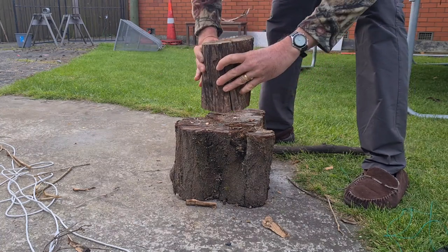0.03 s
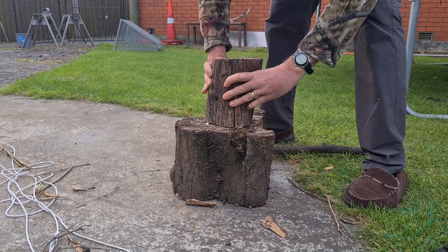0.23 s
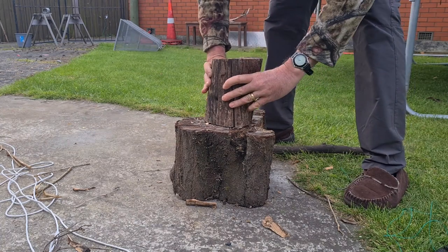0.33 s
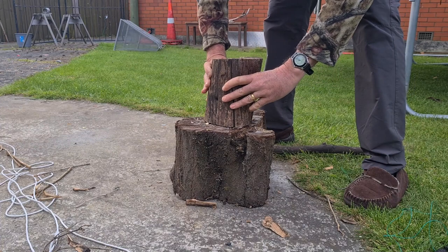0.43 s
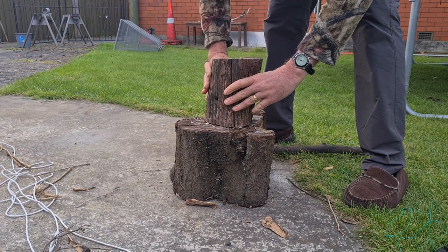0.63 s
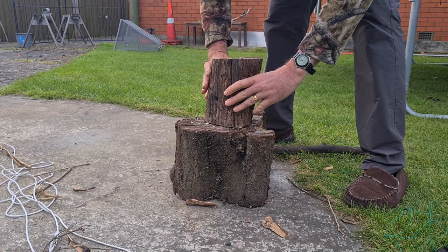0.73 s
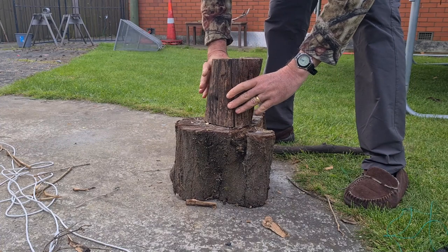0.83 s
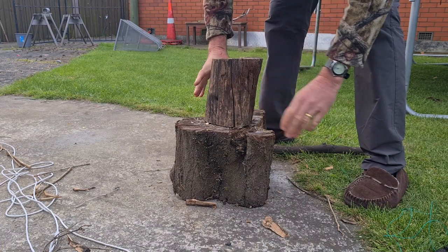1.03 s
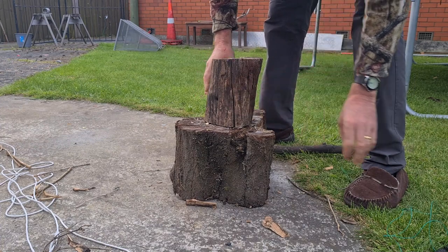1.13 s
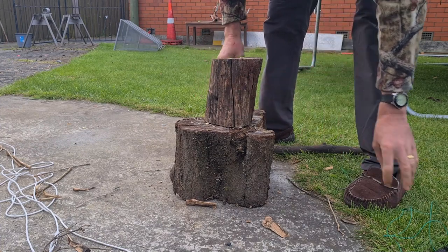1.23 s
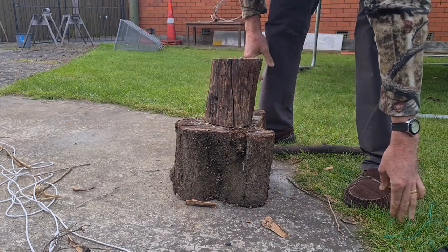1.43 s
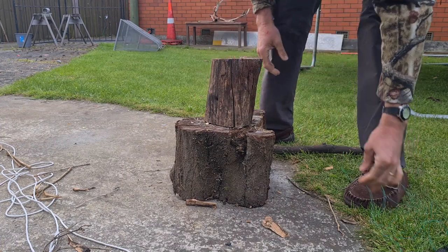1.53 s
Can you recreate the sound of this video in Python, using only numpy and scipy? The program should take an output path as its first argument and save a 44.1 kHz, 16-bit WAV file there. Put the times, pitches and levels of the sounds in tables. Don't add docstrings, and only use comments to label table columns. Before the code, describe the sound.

A single dry wooden knock as a short log lands on a stump and rocks flat, with a gritty crunch and short yard echo; afterwards quiet air, low distant traffic and small bird whistles, heard in close stereo.

```python
import sys
import numpy as np
from scipy import signal
from scipy.fft import rfft, irfft
from scipy.io import wavfile

SR = 44100
rng = np.random.default_rng(int(sys.argv[2]) if len(sys.argv) > 2 else 0)


def inscribe(sig):
    pcm = np.round(np.clip(np.atleast_2d(sig).T, -1, 1) * 32767)
    wavfile.write(sys.argv[1], SR, pcm.astype(np.int16))


def voltage_ratio(level):
    return 10 ** (np.asarray(level, float) / 20)


N = 70560
TIME = np.arange(N) / SR
BIN_HZ = np.arange(N // 2 + 1) * SR / N


def rms_one(x):
    return x / np.sqrt(np.mean(x ** 2) + 1e-20)


def at_hz(points, hz):
    point_hz, value = np.transpose(points)
    return np.interp(np.log(hz), np.log(point_hz), value)


def in_time(rows):
    return np.interp(TIME, *np.transpose(rows))


def pan(db):
    return voltage_ratio(np.array([[db / 2], [-db / 2]]))


def colour(x, spectrum):
    hz = np.maximum(BIN_HZ, 1)
    inside = (hz >= spectrum[0][0]) & (hz < spectrum[-1][0])
    return rms_one(irfft(rfft(x) * voltage_ratio(at_hz(spectrum, hz)) * inside, N))


def spaced(x, lag_ms, sets_in_hz=504):
    share = BIN_HZ ** 2 / (BIN_HZ ** 2 + sets_in_hz ** 2)
    phase = 2 * np.pi * BIN_HZ * lag_ms / 1000 * share
    return np.stack([x[0], irfft(rfft(x[1]) * np.exp(-1j * phase), N)])


# (frequency [Hz], likeness [0-1])
FIELD_LIKENESS = [(30, 0.98), (300, 0.82), (700, 0.75), (1300, 0.6), (2400, 0.63), (4400, 0.083),
                  (8000, 0.25), (15000, 0.0089)]


def wide_noise():
    alike = np.clip(at_hz(FIELD_LIKENESS, np.maximum(BIN_HZ, 1)), 0, 1)
    mid, side = rfft(rng.standard_normal((2, N)))
    stereo = np.sqrt(1 + alike) * mid + np.sqrt(1 - alike) * side * [[1], [-1]]
    return spaced(irfft(stereo, N), lag_ms=0.526)


def resonance(x, hz, width_hz):
    r = np.exp(-np.pi * width_hz / SR)
    for _ in range(2):
        x = signal.lfilter([1, 0, -1], [1, -2 * r * np.cos(2 * np.pi * hz / SR), r * r], x)
    return rms_one(x)


def echoes(x, t60, first_s):
    t = np.arange(SR // 2) / SR
    tail = rng.standard_normal((2, SR // 2)) * voltage_ratio(-60 * t / t60) * (t > first_s)
    tail = tail / np.sqrt(np.sum(tail ** 2, axis=1, keepdims=True))
    return signal.fftconvolve(x[None], tail, axes=1)[:, :N]


# (centre [Hz], width [Hz], level [dB], left-right [dB])
WHINE_BANDS = [(2050, 130, -83, -2), (2590, 170, -73.5, -5), (3800, 190, -78, 1), (4600, 220, -84, -4)]
# (time [s], level [dB])
WHINE_SWELL = [
    (0, -10),
    (.3, -9),
    (.52, -3),
    (.7, 0),
    (1.07, 0),
    (1.13, -10),
    (1.6, -12),
]


def whine():
    out, sag_per_s, patchy_db = 0, .07, 1.0
    sagging = TIME * (1 + sag_per_s * .8) - sag_per_s * TIME ** 2 / 2
    for hz, width_hz, db, left_right_db in WHINE_BANDS:
        band = resonance(wide_noise(), hz, width_hz)
        patches = np.interp(TIME, np.linspace(0, N / SR, 24), rng.standard_normal(24))
        sagged = np.array([np.interp(sagging, TIME, channel) for channel in band])
        out = out + voltage_ratio(db + patchy_db * patches) * pan(left_right_db) * sagged
    return voltage_ratio(in_time(WHINE_SWELL)) * out


# (time [s], level [dB])
TRAFFIC_LEVEL = [
    (0, -65),
    (.15, -56),
    (.45, -67.5),
    (.62, -68),
    (.85, -52.5),
    (1.02, -61.5),
    (1.2, -52),
    (1.38, -50.5),
    (1.5, -54),
    (1.6, -49.5),
]
# (frequency [Hz], density [dB per Hz])
LOW_AIR = [(12, -25), (20, -22), (80, -3.5), (185, -13.5), (401, -22), (498, -19.5), (545, -22.5),
           (990, -21), (1500, -28), (1950, -84), (3300, -120)]
HIGH_AIR = [(880, -12), (1500, -7), (1690, -2), (2140, -8.5), (2870, -11), (4660, -18.5), (7930, -36.5),
            (11600, -33.5), (15800, -32.5)]


def yard():
    low_pan = pan(-1)
    low = voltage_ratio(-52) * colour(wide_noise(), LOW_AIR) * low_pan
    high_db = -68 + 0.17 * (in_time(WHINE_SWELL) + 7.5)
    high = voltage_ratio(high_db) * colour(wide_noise(), HIGH_AIR)
    rumble = resonance(wide_noise(), hz=73, width_hz=32.2)
    return low + high + voltage_ratio(in_time(TRAFFIC_LEVEL) + 3.2) * rumble * low_pan


# (time [s], level [dB], decay t60 [s], left-right [dB])
CRUSHES = [(0.2167, -61, 0.046, 11), (0.2224, -42, 0.017, 2), (0.2264, -42, 0.015, 17),
           (0.228, -62.5, 0.22, 7), (0.2392, -48, 0.0087, 5), (0.2553, -44, 0.0099, 5),
           (0.2574, -42, 0.03, 4.5), (0.259, -60, 0.37, -6.5), (0.277, -55, 0.044, 16),
           (0.295, -57, 0.017, 11), (0.314, -60, 0.017, 8), (.385, -78, 0.12, 10), (1.53, -76, 0.32, -12)]
# (frequency [Hz], density [dB per Hz])
COARSE_GRIT = [(880, 6), (1500, 1), (2540, 2), (3000, -0.5), (5780, -4.5), (7750, -8.5), (9700, -6.5),
               (15500, -15)]
FINE_GRIT = [(880, -21), (1500, 1), (2330, -5), (2940, -5.5), (3720, -3.5), (4440, -23.5), (5780, -7.5),
             (7670, -31), (15500, -21)]


def grit():
    grains_per_s, spread_db, alike, settles_s = 12000, 3.0, 0.28, .25
    sizes = voltage_ratio(spread_db * np.minimum(rng.exponential(1, (3, N)), 4)) * rng.standard_normal((3, N))
    grains = sizes * (rng.random((3, N)) < grains_per_s / SR)
    grains = np.sqrt(alike) * grains[2] + np.sqrt(1 - alike) * grains[:2]
    coarse, fine = colour(grains, COARSE_GRIT), colour(grains, FINE_GRIT)
    out = 0
    for s, db, t60, left_right_db in CRUSHES:
        decay = voltage_ratio(db - 60 * np.maximum(TIME - s, 0) / t60)
        onset = np.clip((TIME - s) / 0.001, 0, 1)
        out = out + pan(left_right_db) * decay * onset * (coarse if s < settles_s else fine)
    return spaced(out, lag_ms=0.418)


def pushes(hits):
    out = np.zeros(N)
    for s, db, ms, sign in hits:
        progress = np.clip((TIME - s) / (ms / 1000), 0, 1)
        out += sign * voltage_ratio(db) * np.sin(np.pi * progress) ** 2 / (ms * SR / 2000)
    return out


def strike(force, modes):
    out = np.zeros(N)
    for hz, db, t60 in modes:
        r, w = voltage_ratio(-60 / (t60 * SR)), 2 * np.pi * hz / SR
        out += voltage_ratio(db) * signal.lfilter([np.sin(w)], [1, -2 * r * np.cos(w), r * r], force + 1e-18)
    return out


# (time [s], strength [dB], contact [ms], push +1 or pull -1)
EDGE_CONTACTS = [
    (.2237, -21.5, 2.08, -1),
    (.2270, -31.5, 1.13, 1),
    (.2313, -11.5, 0.95, -1),
    (.2335, -21, 0.47, -1),
    (.2288, -32, 1.1, 1),
    (.2420, -45, 2.1, 1),
    (.2545, -25.5, 1.56, 1),
]
# (time [s], strength [dB], contact [ms], push +1 or pull -1)
FLAT_CONTACTS = [(.2272, -21, 1.4, 1), (.2420, -22.5, 1.4, 1), (.2560, -27, 2, 1), (.2575, -30, 1.7, 1),
                 (.2737, -26.5, 1.7, 1), (.2750, -20.5, 1.94, -1), (.2766, -13, 1.96, 1),
                 (.2790, -24.5, 1.71, 1), (.2815, -21, 1.39, -1), (.2862, -29.5, 2.14, 1),
                 (.2960, -37.5, 1.8, -1), (.3010, -40, 1.4, -1), (.3040, -40.5, 1.2, 1),
                 (.3120, -45.5, 0.67, -1), (.3420, -52, 1.1, 1), (.3200, -32.5, 2.35, 1),
                 (.3310, -40.5, 2.2, -1), (.3720, -31.5, 5, 1), (.4050, -39.5, 4.1, -1)]
# (time [s], strength [dB])
CHIP_SNAPS = [(.25655, -37), (.25711, -35.5), (.25822, -39), (.2330, -52), (.2375, -55), (.2420, -54),
              (.2468, -51), (.2480, -53), (.2532, -51), (.2655, -53), (.2710, -55), (.2740, -53),
              (.2770, -50), (.2845, -58), (.2925, -56), (.2965, -55), (.3040, -57), (.3220, -58),
              (.3270, -57)]
# (frequency [Hz], level [dB], decay t60 [s])
LOG_MODES = [(159, -10, 0.058), (392, -13, 0.042), (535.3, -5.5, 0.037), (587, -15, 0.035),
             (889, -4.5, 0.022), (1230, -9, 0.024), (1800, -5, 0.0086), (2800, -42, 0.03)]
STUMP_MODES = [(62.6, -1.5, 0.18), (91, -5.5, 0.075), (139, -6.5, 0.044), (248.3, -3.5, 0.0387),
               (328, -14, 0.064), (439, -5.5, 0.031), (625, -8, 0.032), (890, -9.5, 0.013)]
CHIP_MODES = [(1770, -1, 0.015), (2160, -10, 0.038), (2343, -9.5, 0.029), (3656, 1.5, 0.013),
              (5560, -13.5, 0.0059), (7700, -19, 0.0066), (10400, -27, 0.0078)]


def knock():
    chip = strike(pushes([(s, db, .12, -1) for s, db in CHIP_SNAPS]), CHIP_MODES)
    wood = strike(pushes(EDGE_CONTACTS), LOG_MODES) + strike(pushes(FLAT_CONTACTS), STUMP_MODES)
    wood = signal.sosfilt(signal.butter(2, 123, "high", fs=SR, output="sos"), wood)
    returned = echoes(voltage_ratio(-14.5) * wood + voltage_ratio(-45) * chip, t60=0.23, first_s=0.0056)
    return wood * pan(-1.8) + chip * pan(0.36) + returned


# (time [s], length [s], level [dB], pitch [Hz], rise at the start [Hz])
NEAR_NOTES = [(1.092, .022, -69, 2085, 20), (1.152, .034, -66, 2050, -90), (1.185, .015, -72, 1930, -30),
              (1.322, .018, -66, 2310, -60), (1.392, .02, -64, 2405, 20), (1.402, .038, -60, 2420, 20),
              (1.412, .016, -61, 2335, -20), (1.410, .03, -68, 2250, 20), (1.448, .028, -67, 2330, -30),
              (1.455, .022, -67, 2240, -40), (1.435, .015, -70, 2040, 20), (1.450, .018, -61, 2095, 60),
              (1.472, .012, -69, 2060, -40), (1.505, .065, -74, 2530, 50), (1.515, .016, -71, 2340, 30),
              (1.55, .032, -72, 2335, 0), (.908, .135, -95, 7570, -140)]
# (time [s], length [s], level [dB], pitch [Hz], rise at the start [Hz])
FAR_TWITTER = [(.525, .03, -77, 2360, 0), (.612, .035, -78, 2420, 40), (.57, .03, -80, 2640, 0),
               (.655, .03, -79, 2640, 0), (.70, .035, -78, 2660, 0), (.742, .018, -78, 2560, 0),
               (.785, .022, -75, 2570, 0), (.848, .018, -75, 2600, 0), (.862, .022, -75, 2510, 0),
               (.965, .015, -78, 2600, 0), (1.015, .02, -74, 2570, 0), (1.058, .02, -74, 2500, 0),
               (.725, .025, -76, 2050, 30), (.80, .03, -76, 2020, -30), (1.0, .022, -75, 1880, -60),
               (.632, .018, -80, 3900, 0), (.66, .022, -79, 3720, -150), (.722, .025, -79, 3760, -50),
               (.96, .045, -79, 3700, 0), (.865, .025, -83, 4550, 0)]


def birds():
    low, high = whistle(), np.zeros(N)
    twitter = [(s, length, db + 2.5, hz, rise_hz) for s, length, db, hz, rise_hz in FAR_TWITTER]
    for s, length, db, hz, rise_hz in NEAR_NOTES + twitter:
        u = np.maximum(TIME - s, 0)
        is_high = hz >= 5000
        slide_s = length if is_high else 0.01
        phase = 2 * np.pi * (hz * u - rise_hz * slide_s * (1 - np.exp(-u / slide_s)))
        attack, release = u / 0.0027, 1 + (length - u) / .012
        note = voltage_ratio(db + 3.5) * np.sin(phase) * np.clip(np.minimum(attack, release), 0, 1)
        if is_high:
            rough = 1 + .5 * resonance(rng.standard_normal(N), 90, 90)
            high = high + note * voltage_ratio(7 - 85 * u) * rough
        else:
            blur = np.clip((-58 - db) * .045, 0, .5)
            flutter = resonance(rng.standard_normal(N), 45, 90)
            low = low + note * (np.sqrt(1 - blur ** 2) + blur * flutter)
    direct = spaced(low * pan(-2.5), lag_ms=0.47) + high * pan(8)
    return direct + voltage_ratio(-11) * echoes(low, t60=0.59, first_s=0.0084)


# (time [s], pitch [Hz], level [dB])
LONG_WHISTLE = [
    (1.205, 2250, -78),
    (1.210, 2300, -56),
    (1.23, 2412, -60),
    (1.246, 2420, -54),
    (1.286, 2418, -55),
    (1.302, 2440, -63),
    (1.324, 2434, -64),
    (1.34, 2410, -74),
    (1.385, 2412, -73),
]


def whistle():
    s, hz, db = np.transpose(LONG_WHISTLE)
    phase = 2 * np.pi * np.cumsum(np.interp(TIME, s, hz)) / SR
    return np.sqrt(2) * voltage_ratio(np.interp(TIME, s, db, left=-150, right=-150)) * np.sin(phase)


def scene():
    return knock() + grit() + birds() + whine() + yard()


def band_limit(x):
    return signal.sosfilt(signal.butter(12, 15960, fs=SR, output="sos"), x)


def record(dry):
    return band_limit(dry)


dry = scene()
out = record(dry)
inscribe(out)
```